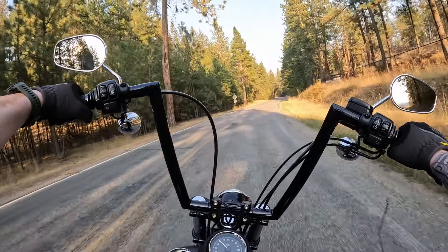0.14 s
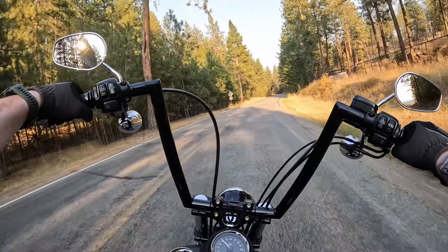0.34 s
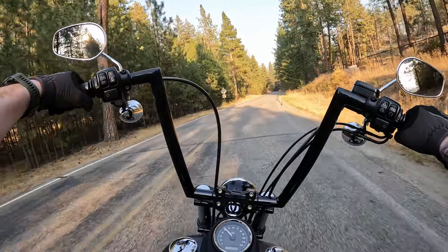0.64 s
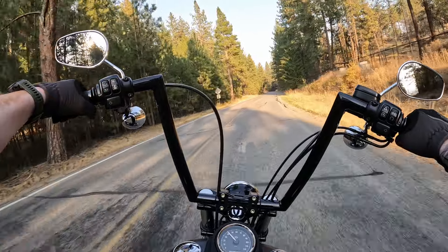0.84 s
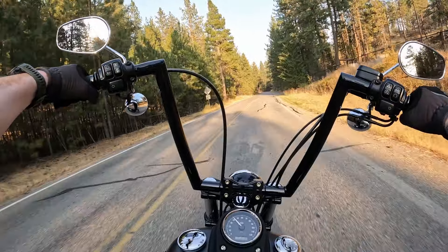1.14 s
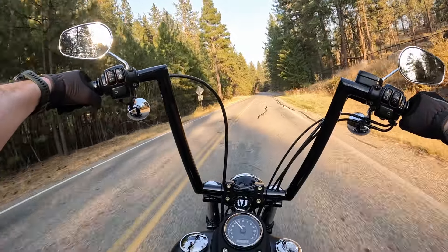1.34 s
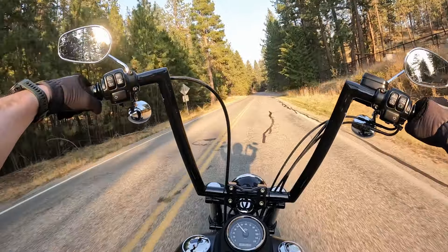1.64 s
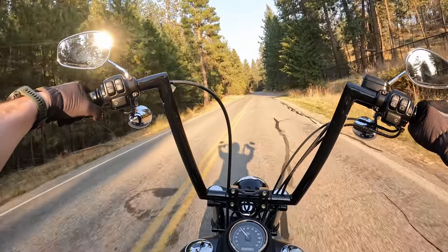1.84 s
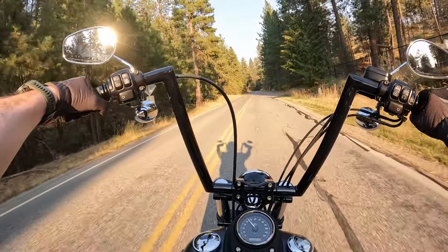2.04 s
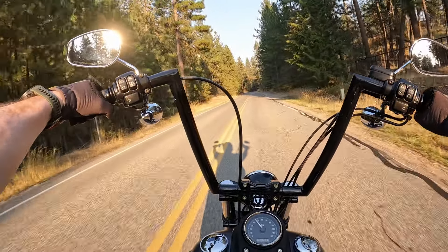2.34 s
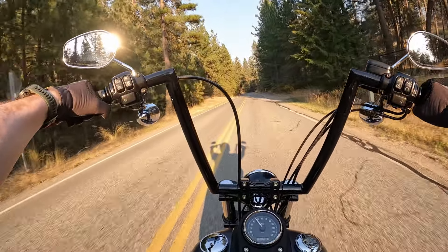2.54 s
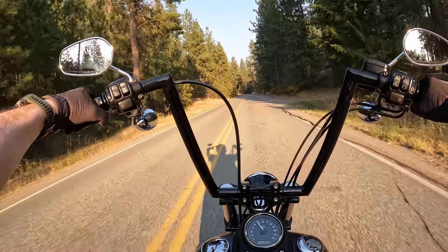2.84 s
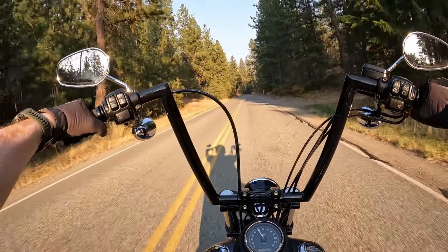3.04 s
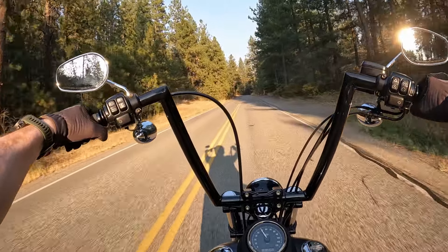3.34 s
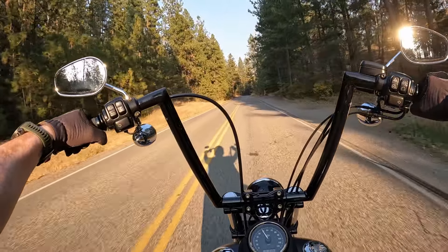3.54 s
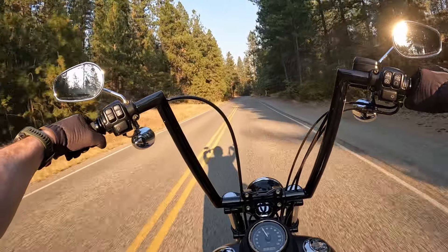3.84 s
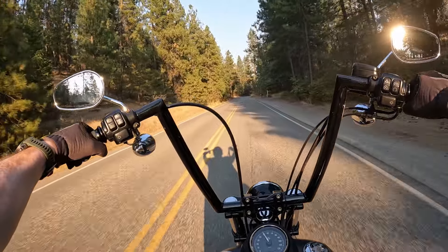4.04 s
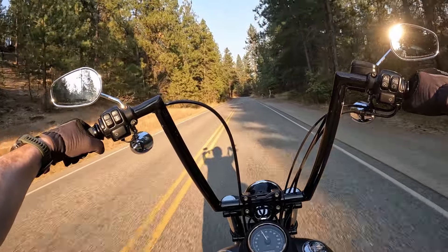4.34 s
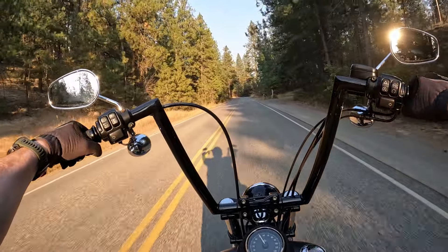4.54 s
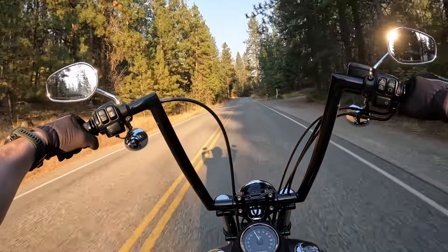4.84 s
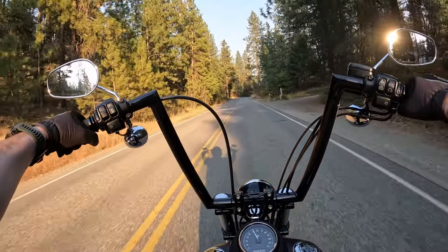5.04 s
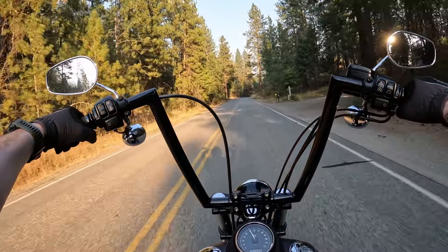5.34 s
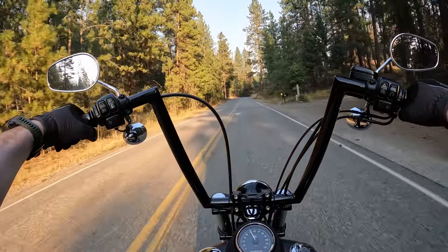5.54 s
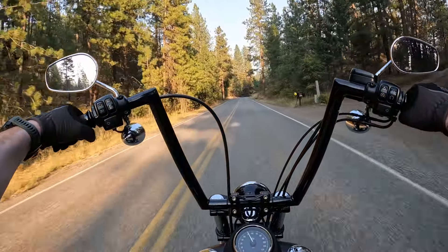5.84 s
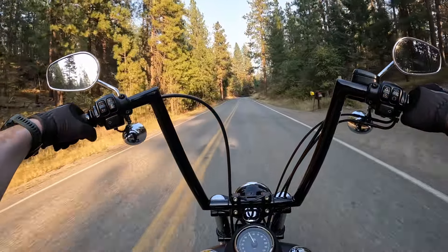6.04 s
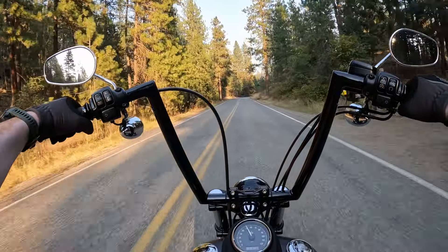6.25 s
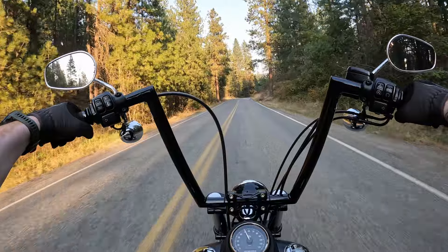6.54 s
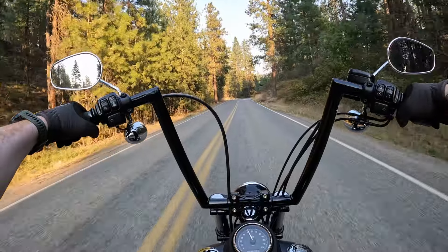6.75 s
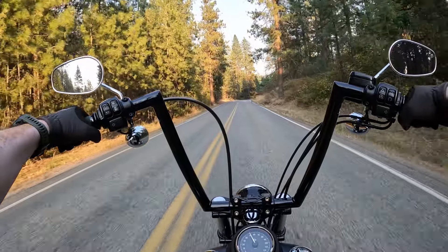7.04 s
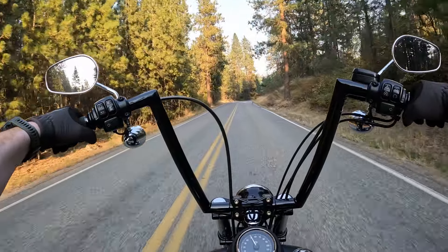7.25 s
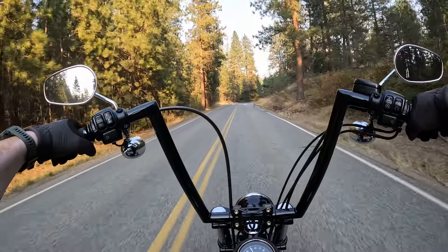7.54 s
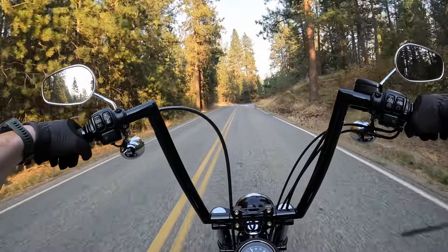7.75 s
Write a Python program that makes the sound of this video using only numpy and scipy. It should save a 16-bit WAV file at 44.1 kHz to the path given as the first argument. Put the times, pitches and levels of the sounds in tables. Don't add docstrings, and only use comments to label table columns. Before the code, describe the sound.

Deep, lumpy motorcycle exhaust drone climbs with a hard twist of throttle, holds steady in buffeting wind, then sags and burbles as throttle shuts.

```python
import sys
import numpy as np
from scipy import signal
from scipy.fft import rfft, irfft
from scipy.io import wavfile
from scipy.ndimage import uniform_filter1d, minimum_filter1d

SR = 44100
rng = np.random.default_rng(int(sys.argv[2]) if len(sys.argv) > 2 else 0)


def dump(signal):
    limited = np.clip(np.atleast_2d(signal).T, -1, 1)
    pcm = np.round(limited * 32767).astype(np.int16)
    wavfile.write(sys.argv[1], SR, pcm)


def ratio(d):
    e = np.asarray(d, float) / 20
    return 10 ** e


N = 348390
TIME = np.arange(N) / SR

# (multiple of the cycle rate, level [dB])
PULL = [(1, -27), (2, -17), (3, -18), (4, -12), (5, 2), (6, -10), (7, -5), (8, -12.5), (9, -8.5),
        (10, -7.5), (11, -12), (12, -10), (13, -18.5), (14, -15.5), (15, -29.5), (16, -32.5)]
HARD = [(1, -27), (2, -9), (3, -10.5), (4, -9.5), (5, 0.5), (6, -9.5), (7, -15), (8, -12), (9, -6),
        (10, -11), (11, -12), (12, -15), (13, -30), (14, -27), (15, -47.5), (16, -33)]
EASE = [(1, -13), (2, -10.5), (3, -15.5), (4, -10), (5, 1.5), (6, -8.5), (7, -15.5), (8, -13), (9, -8),
        (10, -10), (11, -17), (12, -17), (13, -37), (14, -41), (15, -31.5), (16, -31)]
CRUISE = [(1, -10.5), (2, -9.5), (3, -15), (4, -9.5), (5, 1.5), (6, -13.5), (7, -13.5), (8, -14), (9, -12),
          (10, -11), (11, -20.5), (12, -17.5), (13, -27), (14, -36.5), (15, -30.5), (16, -30.5)]
SHUT = [(1, -15), (2, -6.5), (3, -3.5), (4, -2), (5, 2.5), (6, -8.5), (7, -10), (8, -21), (9, -14.5),
        (10, -29), (11, -19.5), (12, -18), (13, -35.5), (14, -36.5), (15, -31), (16, -34)]

PIPE_PULL = (.086, 6.27, .22, .48, 11.5, 5.2, .134, .104, .423)
PIPE_HARD = (.047, 5.05, .3, 1., 7.2, 7.2, .78, .78, .4375)
PIPE_CRUISE = (.056, 5.29, .3, .3, 9., 2.4, .15, .03, .4375)
PIPE_SHUT = (.29, 4.5, 4., 1.1, 6.5, 3.8, -.57, -.57, .4375)

# (drone [dB], pipe-mouth crack [dB], gas puffs [dB], sizzle [dB])
MIX_PULL = (-16, -42, -46.5, -72.5)
MIX_HARD = (-16.5, -43, -52, -75)
MIX_EASE = (-16.5, -40.5, -50, -75)
MIX_CRUISE = (-16.5, -50, -59, -76.5)
MIX_SHUT = (-18.5, -47, -50, -69.5)

LAG_PULL, LAG_HARD, LAG_CRUISE, LAG_SHUT = .02, -.025, 0., .27

# (time [s], drone strengths, pipe ringing, mix, blast lag [cycles])
HOLDS = [(1.7, PULL, PIPE_PULL, MIX_PULL, LAG_PULL),
         (1.9, HARD, PIPE_HARD, MIX_HARD, LAG_HARD),
         (2.4, HARD, PIPE_HARD, MIX_HARD, LAG_HARD),
         (3.0, EASE, PIPE_HARD, MIX_EASE, LAG_HARD),
         (3.8, CRUISE, PIPE_CRUISE, MIX_CRUISE, LAG_CRUISE),
         (6.6, CRUISE, PIPE_CRUISE, MIX_CRUISE, LAG_CRUISE),
         (6.69, SHUT, PIPE_SHUT, MIX_SHUT, LAG_SHUT)]


def curves(table):
    seconds, *columns = np.transpose(table)
    return [np.interp(TIME, seconds, column) for column in columns]


def held(column):
    return curves([(row[0], *np.atleast_1d(row[column])) for row in HOLDS])


def unit(x):
    return x / np.sqrt(np.mean(x ** 2))


def walk(rate):
    hold = int(SR / rate)
    steps = np.repeat(rng.standard_normal(N // hold + 1), hold)
    return 1.3 * uniform_filter1d(uniform_filter1d(steps, hold), hold)[:N]


def coloured(spectrum):
    hz, db = np.transpose(spectrum)
    bins = np.maximum(np.arange(N // 2 + 1) * SR / N, 1)
    gain = ratio(np.interp(np.log(bins), np.log(hz), db, -90, -90))
    return unit(irfft(rfft(rng.standard_normal(N)) * gain, N))


def band(spectrum, lo, hi):
    sos = signal.butter(2, [lo, min(hi, 20000)], "band", fs=SR, output="sos")
    return signal.sosfilt(sos, coloured(spectrum))


def ring(x, hz, width_hz):
    return signal.lfilter(*signal.iirpeak(hz, hz / width_hz, SR), x)


def rush():
    # (frequency [Hz], level [dB per Hz])
    rush_spectrum = [(180, -28), (300, -3), (366, -12), (425, -9.5), (509, -13.5), (664, -17), (733, -17),
                     (1000, -17.5), (1200, -19.5), (1420, -24.5), (4380, -38), (5080, -38.5), (6100, -45),
                     (7000, -46), (15700, -69)]
    edges = 170 * 3. ** np.arange(6)
    return sum(ratio(0.48 * walk(3) + 0.73 * walk(25)) * band(rush_spectrum, lo, hi)
               for lo, hi in zip(edges, edges[1:]))


def wind(hz):
    # (frequency [Hz], level [dB per Hz])
    thump_spectrum = [(1.5, -22), (3, -3), (16, 1), (40, 2.5), (65, -10.5), (100, -29.5)]
    # (frequency [Hz], level [dB per Hz])
    flutter_spectrum = [(35, -16), (55, -8.5), (90, -4), (150, -4.5), (250, -10.5), (400, -19), (700, -40)]
    # (time [s], level [dB])
    headwind = [
        (0, 0.5),
        (2.0, 0.5),
        (2.7, -3),
        (3.5, -0.5),
        (4.8, 2.5),
        (6.0, 0.5),
        (7.3, -1),
        (7.9, 0.5),
    ]
    # (time [s], level above the steady wind [dB], length [s])
    gusts = [(.53, 1.5, .1), (1.547, 5.5, 0.24), (3.22, 3.5, 0.063), (3.67, 7.5, 0.12), (4.303, 3.5, 0.088),
             (4.6, 2.5, 0.15), (5.027, 5, .1), (5.324, 7, 0.11), (5.88, 2, 0.074), (6.4, 4, 0.14),
             (6.854, 2, .12), (7.113, 6.5, .12), (7.748, 5.5, 0.1)]
    faster = hz - 26.5
    head_db, = curves(headwind)
    gust_db = sum(db * np.exp(-((TIME - s) / length) ** 2) for s, db, length in gusts)
    thump_db = -23.5 + 0.75 * faster + gust_db + 1.3 * walk(8.9)
    flutter_db = -25.5 + 0.87 * faster + head_db + 0.39 * gust_db + walk(4.2)
    rush_db = -34 + 0.67 * faster + head_db
    thump = ratio(thump_db) * coloured(thump_spectrum)
    flutter = ratio(flutter_db) * coloured(flutter_spectrum)
    return thump + flutter + ratio(rush_db) * rush()


def whine(cycles):
    # (multiple of the cycle rate, level while pulling [dB], level at cruise [dB])
    gear_lines = [(17, -47, -50), (18, -52, -50), (20, -46.5, -50), (22, -55, -47.5), (23, -51, -49),
                  (25, -55, -44.5), (26, -48, -52), (30, -57.5, -49.5), (35, -51.5, -54), (37, -49, -52),
                  (42, -51, -57), (45, -57, -48), (46, -54, -49)]
    fast = np.interp(TIME, [2.8, 3.8], [0, 1])
    lines = 0
    for k, slow_db, fast_db in gear_lines:
        level = ratio(slow_db + fast * (fast_db - slow_db) + 1.5 * walk(3))
        lines = lines + level * np.cos(2 * np.pi * k * cycles + .7 * walk(2))
    return np.sqrt(2) * lines * ratio(np.interp(TIME, [6.6, 6.7], [-1.5, -8]))


def firings(cycles, hz, rear_db, scatter_db):
    rear_lag = 315 / 720
    for lag, db in ((0, 0), (rear_lag, rear_db)):
        own = cycles - lag + 2
        burns_db = db + scatter_db * rng.standard_normal(300)
        yield own % 1 / hz, ratio(burns_db[own.astype(int)])


def kick(cycles, hz, rear_db, scatter_db):
    return sum(size * np.exp(-((since - .0006) / .0002) ** 2)
               for since, size in firings(cycles, hz, rear_db, scatter_db))


def knock(cycles, hz):
    raps = kick(cycles, hz, rear_db=-5, scatter_db=1.5)
    return unit(ring(ring(raps, 720, 450), 720, 450))


def puffs(cycles, hz, spectrum, edges, fade_s, scatter_db):
    out = 0
    for lo, hi in zip(edges, edges[1:]):
        gate = sum(size * (since / fade_s) * np.exp(-since / fade_s)
                   for since, size in firings(cycles, hz, 0, scatter_db))
        out = out + gate * band(spectrum, lo, hi)
    return unit(out)


def sizzle(blast, hz):
    # (frequency [Hz], level [dB per Hz])
    sizzle_spectrum = [(7000, -8.5), (8800, -5.5), (10200, 4), (10900, -1.5), (11600, 0.5), (13500, -3),
                       (15500, 2), (15900, -39.5)]
    edges = (7000, 9800, 12500, 15800)
    return puffs(blast, hz, sizzle_spectrum, edges, fade_s=.004, scatter_db=1.8)


def gas(blast, hz):
    # (frequency [Hz], level [dB per Hz])
    gas_spectrum = [(500, -27.5), (800, -9), (1200, -16.5), (1480, -22.5), (1800, -12.5), (2300, -23.5),
                    (3000, -22.5), (4000, -26), (4600, -22.5), (5250, -25.5), (5800, -41.5), (6900, -37.5),
                    (8500, -46), (9500, -71)]
    edges = (400, 1500, 2400, 3600, 9600)
    return puffs(blast, hz, gas_spectrum, edges, fade_s=0.0026, scatter_db=2.0)


def crack(cycles, hz):
    kicks = kick(cycles + .002 * walk(25), hz, rear_db=-10, scatter_db=.8)
    first = ring(ring(kicks, 1110, 400), 1260, 400)
    swings = first + ratio(4) * ring(first, 1175, 150)
    gate = sum(size * (1 - np.exp(-since / 0.0039)) * np.exp(-since / 0.0098)
               for since, size in firings(cycles, hz, rear_db=-9.5, scatter_db=2.5))
    rasp = gate * ring(ring(rng.standard_normal(N), 1130, 330), 1130, 330)
    return unit(swings), unit(rasp)


def pipe_timing(k, lag, boom, boom_width, boom_front, bark, bark_width, bark_front, bark_rear, rear_lag):
    rear = np.exp(-2j * np.pi * k * rear_lag)
    low, high = (1j * k * width / (peak * peak - k * k + 1j * k * width)
                 for peak, width in ((boom, boom_width), (bark, bark_width)))
    pipes = low * (boom_front + rear) + high * (bark_front + bark_rear * rear)
    both = -np.exp(-2j * np.pi * k * lag) * pipes
    return both / abs(both)


def drone(cycles, level_db, wobble_db=0.2):
    when = [row[0] for row in HOLDS]
    rough = ratio(4 * (TIME > HOLDS[-1][0]))
    out = 0
    for i, (k, _) in enumerate(PULL):
        db = np.interp(TIME, when, [row[1][i][1] for row in HOLDS])
        timing = np.interp(TIME, when, [pipe_timing(k, *row[2]) for row in HOLDS])
        level = ratio(db + wobble_db * rough * walk(14))
        out = out + level * np.cos(2 * np.pi * k * cycles + np.angle(timing))
    return np.sqrt(2) * out * ratio(level_db)


def scene():
    # (time [s], four-stroke cycle rate [Hz])
    speed = [(0, 20.61), (.5, 21.39), (1.5, 22.43), (1.8, 22.85), (2.1, 23.73), (2.4, 24.45), (2.8, 25.21),
             (3.2, 25.78), (3.6, 26.12), (4.2, 26.34), (4.8, 26.47), (6, 26.6), (6.5, 26.97), (6.6, 26.8),
             (6.74, 26.22), (6.9, 26.19), (7.2, 25.54), (7.9, 24.26)]
    # (time [s], level [dB])
    effort = [(0, 1), (.4, 0), (1, -2), (1.65, -4.5), (1.8, 6), (1.95, 16.5), (2.2, 12.5), (2.5, 7.5),
              (2.77, 5), (2.82, 0.5), (3.2, -3), (3.8, -3.5), (4.4, -3), (5.4, 4), (6.2, 6), (6.55, -1),
              (6.65, -5), (6.72, -1.5)]
    hz, = curves(speed)
    effort_db, = curves(effort)
    cycles = -.2957 + np.cumsum(hz) / SR
    blast = cycles - held(4)[0]
    effort_share = np.array([[0.1], [1], [.95], [0.95]])
    drone_db, crack_db, gas_db, sizzle_db = held(3) + effort_db * effort_share
    knock_db = -46 + 0.11 * effort_db + drone_db - MIX_PULL[0]

    swings, rasp = crack(blast, hz)
    bark = ratio(crack_db) * swings + ratio(.28 * crack_db - 29.5) * rasp
    mix = wind(hz) + whine(cycles) + ratio(knock_db) * knock(blast, hz)
    mix = mix + ratio(sizzle_db) * sizzle(blast, hz) + ratio(gas_db + 2) * gas(blast, hz)
    return (mix + bark + drone(cycles, drone_db))[None]


def top_cut(x):
    return signal.sosfilt(signal.butter(12, 15820, fs=SR, output="sos"), x)


def record(dry):
    ceiling, span = .81, 441
    room = minimum_filter1d(np.minimum(1, ceiling / (abs(dry) + 1e-9)), size=span)
    fade = np.minimum(1, (N / SR - TIME) / .012)
    return top_cut(dry * fade * uniform_filter1d(room, size=span))


dry = scene()
out = record(dry)
dump(out)
```